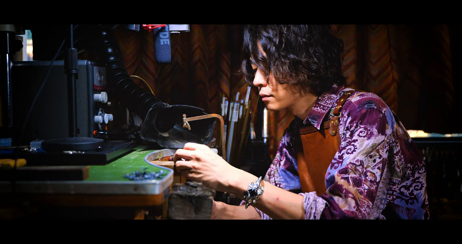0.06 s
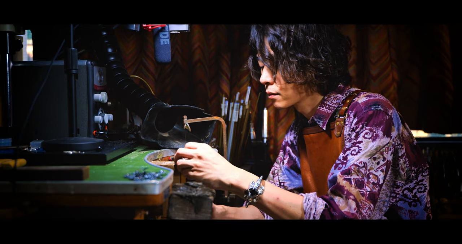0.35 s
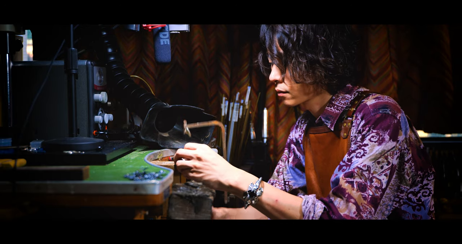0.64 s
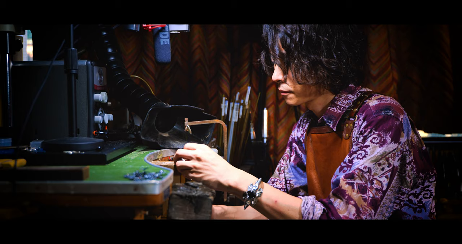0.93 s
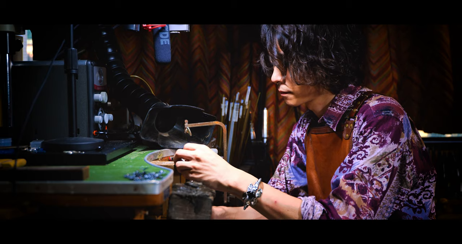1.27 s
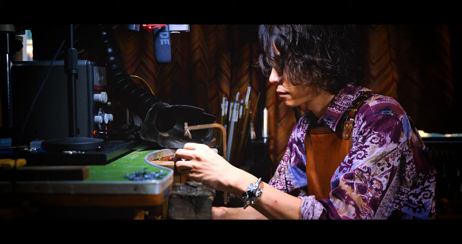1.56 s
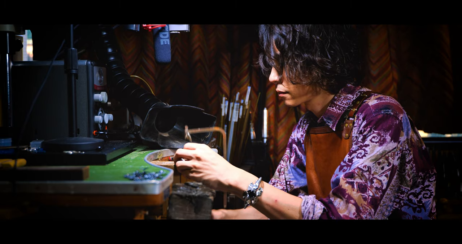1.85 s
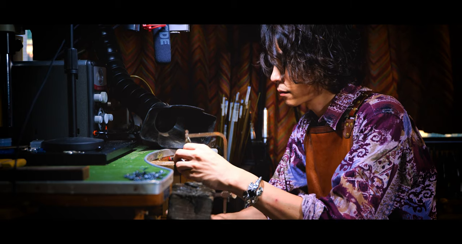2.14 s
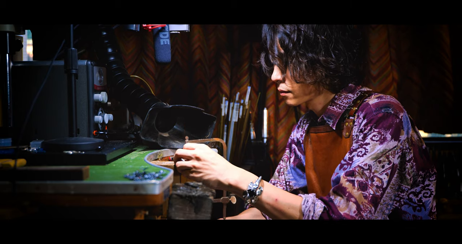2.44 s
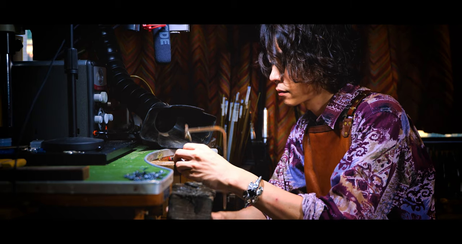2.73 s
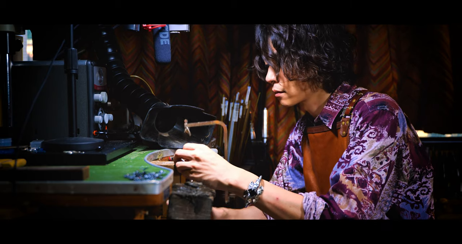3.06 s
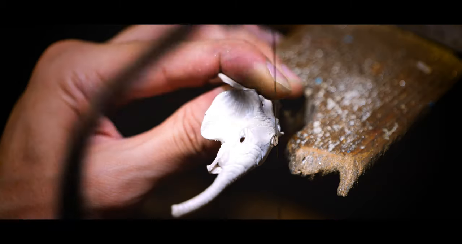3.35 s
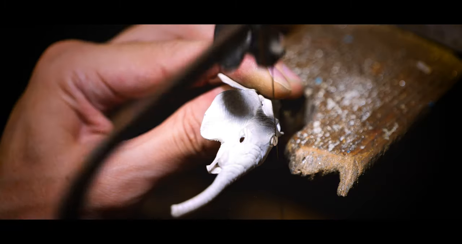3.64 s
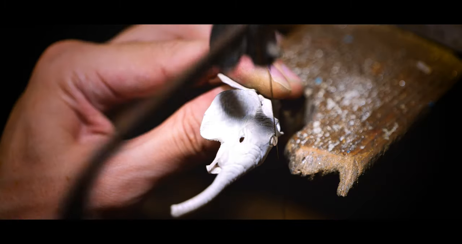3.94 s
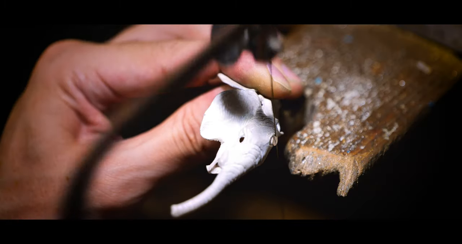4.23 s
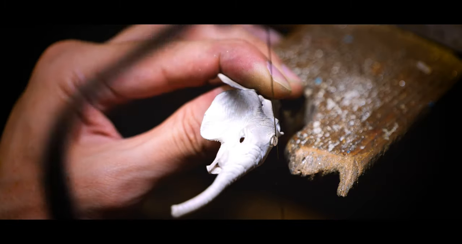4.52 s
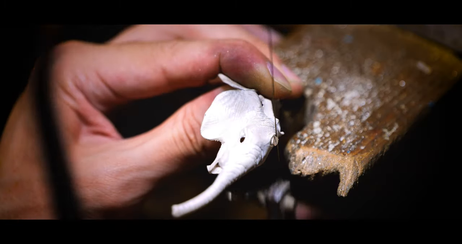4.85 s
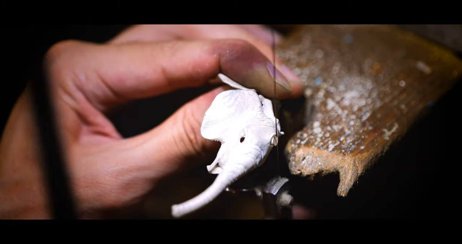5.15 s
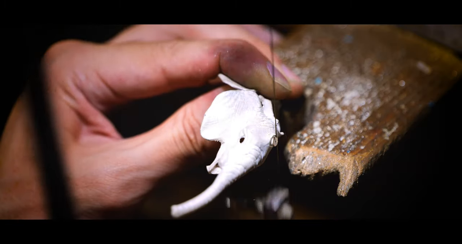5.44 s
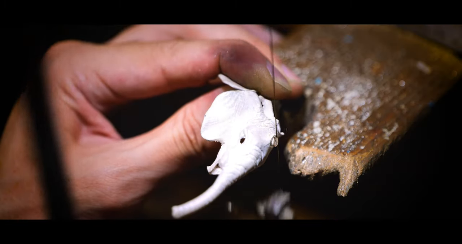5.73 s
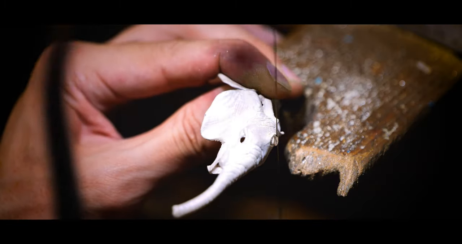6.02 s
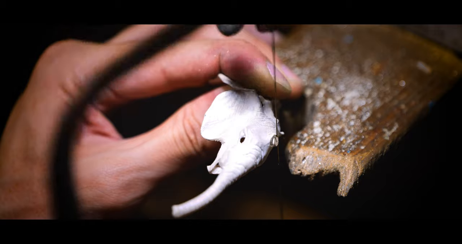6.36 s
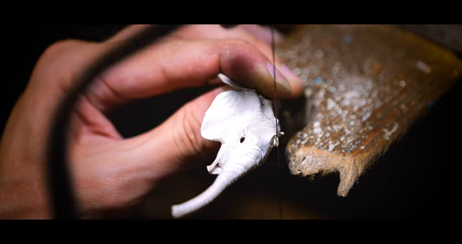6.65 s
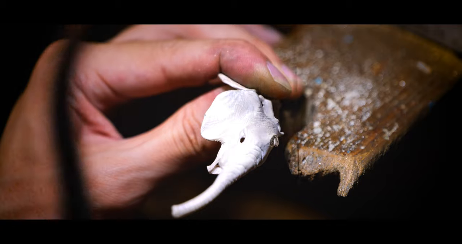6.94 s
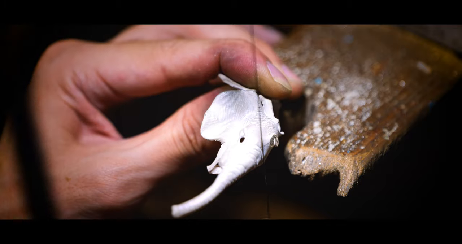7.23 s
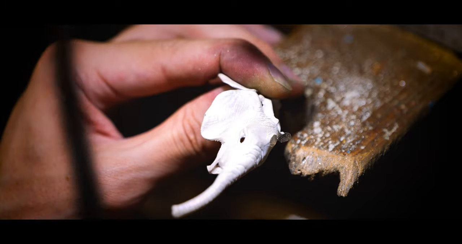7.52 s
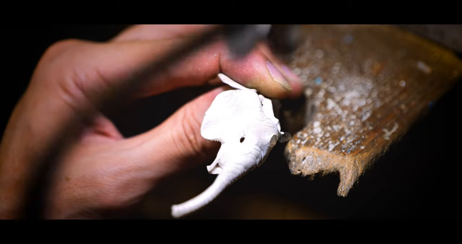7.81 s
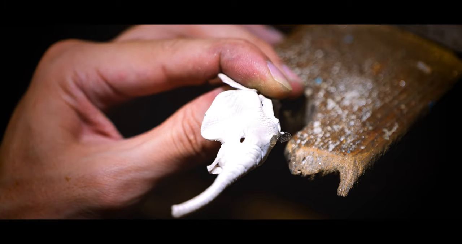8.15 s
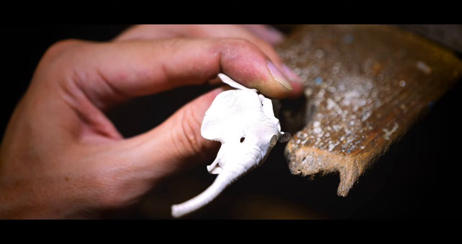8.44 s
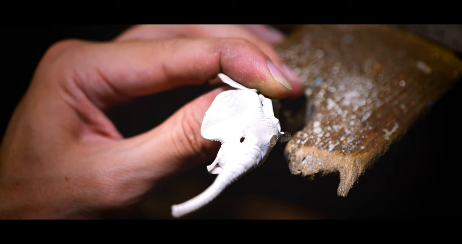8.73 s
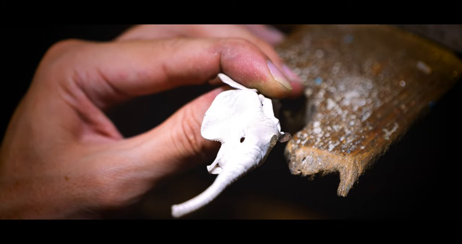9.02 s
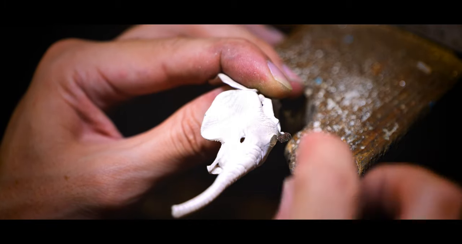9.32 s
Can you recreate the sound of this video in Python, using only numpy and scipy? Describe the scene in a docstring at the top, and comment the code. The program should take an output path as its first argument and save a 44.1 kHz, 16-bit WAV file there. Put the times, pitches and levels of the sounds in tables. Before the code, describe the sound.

A thin saw blade is set against a small metal piece with a light ping and scratch right at the start. From about 0.5 seconds a jeweller's hand saw rasps back and forth, quickening to around seven strokes a second by 3 seconds. The fine teeth make a bright, gritty sound, mixed with thin whistles and many brief squeals as the blade binds. Irregular ticks and small knocks come from the saw frame and the wooden support when the teeth catch. The sawing stops at about 6.8 seconds. Between 7.2 and 7.7 seconds the blade comes free with light pings, a scratch and a small metallic clank. From 8.6 to 9 seconds the saw is laid on the wooden bench with a few clacks, the loudest a sharp knock at 8.8. The microphone is close, in a small, quiet room with a faint fan whine.

```python
"""Jeweller's saw at the bench

One microphone, close to a wooden bench pin in a small, quiet room with a faint fan whine.
A saw cuts a small silver piece, about seven strokes a second: the teeth grab and rasp, shaking frame
and pin, and the work divides the taut blade into two lengths that whistle and squeal when it binds.
The blade pings as it is set in and drawn out; then the saw is laid down on the bench."""
import sys
import numpy as np
from scipy import signal
from scipy.fft import rfft, irfft
from scipy.io import wavfile
from scipy.ndimage import uniform_filter1d, map_coordinates

SR = 44100
rng = np.random.default_rng(int(sys.argv[2]) if len(sys.argv) > 2 else 0)


def materialize(psi):
    """Save the field psi as 16-bit PCM at rate SR to the path in sys.argv[1].

    A 1-D psi becomes a single channel; in a 2-D psi each row is a channel.
    """
    bounded = np.clip(np.atleast_2d(psi).T, -1, 1)
    quanta = np.round(bounded * 32767).astype(np.int16)
    wavfile.write(sys.argv[1], SR, quanta)


N = 422478

# Room tone at the microphone. Each row: frequency in Hz, relative level in dB.
AIR_SPECTRUM = [(15, -52), (25, -25.5), (59, 1), (136, -15), (169, 0.5), (209, -7), (305, -11.5),
                (895, -13), (1020, -7), (1240, -15), (2230, -19.5), (3170, -17.5), (3830, -21.5),
                (12200, -33), (15500, -37.5)]
# The room tone sinks near the end. Each row: time in seconds, relative level in dB.
AIR_FADE = [(7, -67.5), (8, -66.5), (8.5, -71), (9.5, -75.5)]
# The fan's whine. Each row: frequency in Hz, relative level in dB.
FAN_TONES = [(963.6, -79), (1044, -86), (1174, -87), (1378, -92.5)]

# Teeth catch or the saw bumps the work. Each row: start in seconds, frame peak in dB, length in seconds.
JOLT_EVENTS = [(0.01, -32, 0.1), (0.058, -22, 0.063), (0.221, -24.5, 0.022), (1.043, -22.5, .03),
               (1.415, -13.5, 0.066), (1.457, -8, 0.025), (1.531, -15.5, 0.1), (1.597, -25, 0.047),
               (1.862, -14.5, 0.11), (2.074, -6, 0.072), (2.104, -10, .07), (2.212, -13, 0.069),
               (2.242, -14, 0.042), (2.381, -16.5, 0.027), (2.406, -12.5, 0.043), (2.442, -12.5, 0.039),
               (2.488, -11.5, 0.055), (2.555, -9.5, 0.075), (2.776, -9.5, 0.044), (2.827, -13, 0.066),
               (2.914, -12, 0.066), (3.317, -15.5, 0.048), (3.657, -17.5, .14), (3.89, -12, 0.088),
               (4.469, -15, 0.079), (4.979, -9, 0.068), (5.079, -15.5, 0.033), (5.32, -14.5, 0.079),
               (5.623, -16, 0.063), (5.8, -8.5, 0.024), (5.843, -14, 0.17), (6.366, -12, 0.14),
               (6.509, -18, 0.082), (7.609, -25, 0.035), (7.65, -24.5, 0.018)]
# The hold on the work tightens. Each row: time in seconds, firmness from 0 to 1.
GRIP_CURVE = [(2.9, 0), (3.15, 0.38), (3.6, 0.73)]
# Resonances of the saw frame and of the wooden bench pin.
# Each row: frequency in Hz, width in Hz, level in dB held loosely, level in dB held firmly.
FRAME_MODES = [(576, 59, -19.5, 2.5), (629, 10, -9.5, -4), (779.7, 49, -4, 14), (909, 34, -3.5, -9.5),
               (952, 80, -2.5, -4), (1053.6, 51, 3.5, 2), (1235, 19, -20, -1), (1282, 59, -13.5, 7.5),
               (1366, 43, -24.5, 5), (1456, 58, -10.5, -28), (1940, 170, -18, -8)]
PIN_MODES = [(135, 45, -30, -20), (203, 27, -2, 4), (248, 36, -2, -7), (355, 55, 1, -7),
             (408, 42, -5, -7.5)]
JOLT_PIN_DB, JOLT_GRIP_DB = -18.5, 13  # the pin's share of a jolt; what a full grip adds to it
JOLT_LOOSENS = 0.58  # share of the grip that a jolt shakes loose
JOLT_RISE_S, JUDDER_S = 0.002, .06  # a shove's rise; one longer than JUDDER_S swells gradually

# The blade is plucked. Each row: start in seconds, peak in dB, 0 if threaded in the work or 1 if free,
# factor on the ring time.
PLUCK_EVENTS = [(0.0218, -36, 0, 0.64), (.065, -16.5, 0, 0.95), (6.8735, -51.5, 1, 2.2),
                (7.228, -50.5, 1, 0.71), (7.313, -35, 1, 0.8), (7.3733, -39, 1, 0.62),
                (7.385, -27.5, 1, 0.57), (7.4314, -43, 1, 0.45), (7.5555, -41.5, 1, 1.6),
                (7.5848, -37, 1, 0.59)]
# The saw's ring, threaded in the work and free of it.
# Each row: frequency in Hz, relative level in dB, base time to fall 60 dB in seconds.
THREADED_MODES = [(1060, -9, .2), (1750, 3, .17), (2672, -7, .17), (3300, 1, .1), (3930, 3, .08),
                  (4651, -11, .14), (5190, -2, .13), (10890, -3, .055)]
FREE_MODES = [(360, -14, .2), (800, -7, .12), (1066, -14, .12), (1290, -25, .38), (1572, -13, .15),
              (1850, -8, .12), (2380, -8, .15), (2466, -13, .39), (2670, -3, .16), (3080, -5, .17),
              (3645, -9, .36), (4620, -16, .15), (4885, -16, .15), (5740, -19, .1), (6270, -24, .15)]
# Resonances of blade, clamps and work. Each row: frequency in Hz, width in Hz, level in dB.
STEEL_MODES = [(1900, 45, 6), (1971, 55, 9), (2122, 55, 4), (2280, 24, 13), (2346, 70, 6), (2470, 60, 3),
               (2670, 19, 18), (2880, 130, 2.5), (3068, 20, 10), (3238, 26, 7), (3900, 90, 0),
               (4645, 50, -3.5), (5146, 60, -16), (5690, 70, -14), (6190, 120, -19), (6430, 25, -14),
               (11000, 540, -31), (14000, 200, -31.5)]
# The broad hiss of the cut. Each row: frequency in Hz, level in dB.
HISS_SPECTRUM = [(1200, -65.5), (1800, -27.5), (3000, -29.5), (4500, -46.5), (7000, -32.5), (11500, -29),
                 (12300, -48), (14300, -52), (15700, -52.5)]
# The blade is set in or drawn out. Each row: centre in seconds, half length in seconds, level in dB.
DRAG_EVENTS = [(0.053, 0.013, -39), (6.768, 0.025, -40), (7.394, 0.052, -50), (7.625, 0.019, -31)]

# Cutting pulls alternate with light returns, a pull first. Each row: start in seconds, force in dB.
HAND_STROKES = [(0.39, -13), (0.487, -10.5), (0.629, -5), (0.847, -2), (1.027, -2.5), (1.185, -3),
                (1.35, -2.5), (1.512, -0.5), (1.68, 1), (1.85, 0), (2.029, 0.5), (2.197, -1), (2.367, -2.5),
                (2.539, -0.5), (2.729, 1), (2.908, 1.5), (3.07, 2.5), (3.207, 2), (3.343, 1), (3.467, 3.5),
                (3.61, 4.5), (3.748, 5), (3.88, 2.5), (4.013, 2), (4.149, 1.5), (4.279, 0), (4.426, -2),
                (4.553, -2.5), (4.688, -0.5), (4.829, 0), (4.963, -2), (5.114, 0.5), (5.243, 0.5),
                (5.382, 0), (5.521, -1.5), (5.652, 1), (5.786, -2), (5.915, 1.5), (6.042, -1.5),
                (6.177, -2), (6.31, -1), (6.44, 0.5), (6.579, -3.5), (6.724, -23)]
STOP_S = 6.83  # the last stroke ends
# Share of the blade above the work where the hand turns.
# Each row: time in seconds, share before a pull, share before a return.
BLADE_SWING = [(.4, .43, .76), (2.6, .42, .78), (3.1, .34, .69), (3.6, .275, .67), (5, .305, .615),
               (6.7, .29, .63)]
# How a stroke's force is shared among the parts; first row held loosely, second row firmly.
# Each row: relative gain in dB on a pull, relative gain in dB on a return.
PIN_DRIVE = [(-35.5, -42), (-26.5, -32.5)]
FRAME_DRIVE = [(-22.5, -26), (-25, -30)]
RASP_DRIVE = [(-31.5, -35.5), (-24, -25.5)]
WHISTLE_DRIVE = [(-45, -40.5), (-40, -30)]
PULL_SWELL_DB, RETURN_SWELL_DB = 1.5, -4  # a pull leans in from start to end, a return eases off
WHISTLE_SWELL_DB = 3  # the blade's song builds up during a stroke
# Rasp and whistle as the cut goes on. Each row: time in seconds, gain in dB.
CUT_KEENNESS = [(.56, -46), (.64, -2.5), (2.2, -3.5), (2.5, 1.5), (3.3, -2), (4.3, 1), (4.6, 1), (5.3, 1.5),
                (5.6, -3.5), (6.68, -2.5), (6.76, -32)]
TOOTH_HZ, TOOTH_SPREAD, TOOTH_JITTER = 1080, .07, .09  # mid-stroke rate; spread by stroke; unevenness
# Harmonics of the whistle. Each row: multiple of the pitch, relative level in dB.
WHISTLE_HARMONICS = [(1, 0), (2, -1), (3, -6), (4, -10)]
# How well the blade sings. Each row: frequency in Hz, relative level in dB.
WHISTLE_SPECTRUM = [(1200, -16), (2000, -5), (2700, 1), (3900, 2), (4300, -1), (4650, 4), (5000, -3),
                    (6400, -4), (8500, -8), (11000, -10), (13000, -28)]

# The blade binds in the cut. Each row: centre in seconds, pitch in Hz, level in dB,
# half length in seconds, glide (1 rising, -1 falling, 0 steady).
SQUEAL_EVENTS = [(0.767, 2660, -32.5, 0.016, 1), (0.931, 2660, -34, 0.03, -1),
                 (1.31, 2900, -30.5, 0.0063, 1), (1.622, 2485, -29.5, 0.026, 1),
                 (1.653, 2810, -29, 0.015, 1), (1.753, 2740, -28, 0.013, 1), (1.935, 4650, -35, .02, 1),
                 (2.316, 2925, -28, 0.0066, 1), (2.454, 2704, -28, 0.03, 0), (2.638, 2686, -18, 0.029, 0),
                 (2.656, 2950, -25, 0.0088, 1), (2.815, 2640, -24, 0.014, 1),
                 (3.003, 2713, -25.5, 0.019, 1), (3.191, 2734, -25.5, 0.016, 0),
                 (3.409, 4610, -34.5, 0.011, 1), (3.531, 4530, -27.5, .01, -1),
                 (3.549, 3324, -26, 0.027, 1), (3.706, 3070, -17.5, 0.021, 1),
                 (3.827, 2184, -21.5, 0.024, -1), (3.845, 3760, -23.5, 0.011, 1),
                 (3.941, 4530, -25.5, 0.011, 1), (4.083, 4673, -28.5, 0.011, -1),
                 (4.099, 3040, -21.5, 0.029, 1), (4.232, 2682, -26.5, 0.017, 1),
                 (4.363, 3047, -30, .018, 1), (4.612, 4660, -28, 0.0094, -1), (4.898, 2830, -30, 0.022, 1),
                 (5.074, 3210, -25, 0.019, 1), (5.166, 2664, -21.5, 0.037, 0),
                 (5.17, 4640, -26, 0.0094, -1), (5.349, 2957, -19.5, 0.024, 1),
                 (5.443, 2790, -20, 0.021, 1), (5.87, 4670, -31.5, 0.0081, 1),
                 (5.884, 2685, -25.5, 0.013, 0), (5.934, 2694, -19.5, 0.0081, 0),
                 (6.12, 4603, -38, 0.018, 1), (6.249, 3080, -28, 0.026, 1), (6.524, 3250, -25, 0.021, 1),
                 (6.683, 2657, -29, 0.026, 0)]
# Harmonics of a squeal. Each row: multiple of the pitch, relative level in dB.
SQUEAL_HARMONICS = [(1, 0), (2, -27), (3, -37)]
SQUEAL_ROUGH, SQUEAL_BREAK_DB = 0.55, 3.5  # share of flutter; the note catches and drops out
SQUEAL_COLOUR = .45  # how far the steel's resonances shape the note
SQUEAL_LEAD_DB, SQUEAL_LEAD_S = -19.5, 0.035  # a gliding note sounds softly before and after its peak
SQUEAL_TOP_HZ = 4720  # a high note levels off on a resonance of the frame
SQUEAL_EASE_DB = -2  # a squealing blade slides, so frame and pin shake less

# Dull bumps through the bench while sawing. Each row: start in seconds, peak in dB.
BUMP_EVENTS = [(1.82, -46), (2.541, -47)]
BUMP_RISE_S, BUMP_T60_S, BENCH_CUTOFF_HZ = 0.038, 0.3, 58.4

# The freed saw's bow strikes the work. Each row: start in seconds, peak in dB.
CLANK_EVENTS = [(7.6104, -27), (7.6196, -25), (7.651, -23.5)]
BOW_HZ, BOW_DB = 1239, 18.5  # a blow on the bow favours the modes around this pitch, by this much
CLANK_RING = .85  # the hand on the bow shortens its ring to this share

# The saw is laid down. Each row: start in seconds, relative thud level in dB, clack peak in dB.
KNOCK_EVENTS = [(8.6395, -17, -17), (8.687, -27, -52.5), (8.7096, -26.5, -25.5), (8.8234, -5, -1.5),
                (8.877, -24, -18), (8.962, -30.5, -70), (8.9839, -34.5, -34)]
# The bench top. Each row: frequency in Hz, relative level in dB, time to fall 60 dB in seconds.
BENCH_MODES = [(78, -16, .42), (165, -14, .32), (268, -8, .25), (352, -4, .26), (385, -6, .2),
               (420, -3, .22), (535, -12, .22), (620, -10, .2), (690, -8, .15), (765, -6, .14),
               (825, -5, .14), (935, -10, .14)]
# The wood's dense, short thud and the steel's clack. Each row: frequency in Hz, relative level in dB.
THUD_SPECTRUM = [(60, -23), (200, -3), (380, 0), (800, -14), (1300, -14.5), (3000, -54)]
CLACK_SPECTRUM = [(290, -33), (500, -17.5), (815, -7), (888, -17), (1180, -21), (1290, -25.5),
                  (1750, -18.5), (2760, -7), (4130, -13.5), (7130, -30), (11600, -34), (15500, -50.5)]

# The workshop's echo. Each row: frequency in Hz, time to fall 60 dB in seconds.
ROOM_DECAY = [(100, .42), (400, .32), (1500, .28), (4000, .25), (12000, .2)]
CEILING, TOP_HZ = .67, 15750  # the recorder's full scale and band limit


def amp(db):
    """Decibels to gain."""
    return 10 ** (np.asarray(db) / 20)


def unit(x):
    """Scale to rms 1."""
    return x / np.sqrt(np.mean(x ** 2) + 1e-20)


def along(points, hz):
    """Interpolate (Hz, value) points on a log frequency axis."""
    f, v = np.transpose(points)
    return np.interp(np.log(hz + 1), np.log(f + 1), v)


def clock():
    """The time of every sample in seconds."""
    return np.arange(N) / SR


def wobble(rate):
    """A smooth random curve, rate knots a second."""
    knots = rng.standard_normal(int(N * rate / SR) + 4)
    return map_coordinates(knots, [np.arange(N) * rate / SR], order=2)


def resonances(modes, hz):
    """Gain of (Hz, width, dB) peaks with steep skirts; little radiates below a peak."""
    power = 0
    for f, width, db in modes:
        peak = 1 / (1 + ((hz - f) / width * 2) ** 2)
        skirts = np.minimum(hz / f, 1) ** 3 / (1 + ((hz - f) / f * 4) ** 2)
        power += amp(db) ** 2 * peak * skirts
    return np.sqrt(power)


def body(x, gain, size=16384):
    """Ring x through a minimum-phase filter of energy 1, shaped by gain(hz)."""
    hz = np.fft.rfftfreq(size, 1 / SR)
    cepstrum = irfft(np.log(np.maximum(gain(hz), 1e-6)))
    cepstrum[1:size // 2] *= 2
    cepstrum[size // 2 + 1:] = 0
    response = irfft(np.exp(rfft(cepstrum)))
    return signal.fftconvolve(x, response / np.linalg.norm(response))[:len(x)]


def coloured(x, spectrum):
    """Shape x with a spectrum of (Hz, dB) points."""
    return body(x, lambda hz: amp(along(spectrum, hz)))


def ring(modes, t, scatter_db):
    """Dying (Hz, dB, t60) modes at new strengths for each blow."""
    return sum(amp(db + scatter_db * rng.normal() - 60 * t / t60)
               * np.sin(2 * np.pi * (hz * t + rng.random())) for hz, db, t60 in modes)


def add(track, s, db, sound):
    """Lay a sound into the track at time s with its peak at db."""
    part = track[round(s * SR):][:len(sound)]
    part += amp(db) * sound[:len(part)] / np.abs(sound).max()


def room_tone():
    """Faint room noise with a wavering fan whine, behind everything else."""
    t = clock()
    noise = unit(coloured(rng.standard_normal(N), AIR_SPECTRUM))
    whine = sum(amp(db + 1.6 * wobble(2.6)) * np.sin(2 * np.pi * hz * t + .7 * wobble(12))
                for hz, db in FAN_TONES)
    fade_db = np.interp(t, *np.transpose(AIR_FADE))
    return amp(fade_db - 2) * noise + amp(1.5) * whine


def firmness(s):
    """How firmly the work is held at times s, 0-1."""
    return np.interp(s, *np.transpose(GRIP_CURVE))


def gripped(x, modes, firm):
    """Ring x in a held object: its ring shifts as the grip tightens."""
    loose_modes = [(f, width, db) for f, width, db, _ in modes]
    firm_modes = [(f, width, db) for f, width, _, db in modes]
    loose_ring = body(x, lambda hz: resonances(loose_modes, hz), size=8192)
    firm_ring = body(x, lambda hz: resonances(firm_modes, hz), size=8192)
    return (1 - firm) * loose_ring + firm * firm_ring


def jolts():
    """Shoves and short judders ring the frame and, more so under a firm grip, the bench pin."""
    t = np.arange(SR // 3) / SR
    track = np.zeros(N)
    for s, db, length_s in JOLT_EVENTS:
        rise = 1 - np.exp(-t / max(JOLT_RISE_S, (length_s - JUDDER_S) / 2))
        shove = rng.standard_normal(len(t)) * rise * amp(-60 * (t / length_s) ** 1.1)
        firm = firmness(s) * (1 - JOLT_LOOSENS)
        add(track, s, db, gripped(shove, FRAME_MODES, firm))
        add(track, s, db + JOLT_PIN_DB + JOLT_GRIP_DB * firmness(s), gripped(shove, PIN_MODES, firm))
    return track


def steel_gain(hz):
    """The steel's resonances on the broad hiss of the cut."""
    return resonances(STEEL_MODES, hz) + amp(along(HISS_SPECTRUM, hz))


def plucks():
    """A tooth slips off an edge with a scratch, and the taut blade pings until the work damps it."""
    t = np.arange(SR // 2) / SR
    track = np.zeros(N)
    for s, db, free, sustain in PLUCK_EVENTS:
        modes = [(hz, level, t60 * sustain) for hz, level, t60 in (FREE_MODES if free else THREADED_MODES)]
        ping = ring(modes, t, scatter_db=2) * (1 - np.exp(-t / .00024))
        scratch = amp(-60 * t / 0.039) * rng.standard_normal(len(t))
        add(track, s, db, ping)
        add(track, s, db - 8.5, body(scratch, lambda hz: steel_gain(hz) ** 0.47))
    return track


def bites(rate, scatter_db):
    """Irregular tooth impacts, rate a second, of unequal size and rms 1."""
    chance = np.clip(rate / SR, 1e-4, 1)
    size = amp(scatter_db * np.clip(rng.standard_normal(N), -2, 2)) * rng.choice([-1, 1], N)
    return unit((rng.random(N) < chance) * size / np.sqrt(chance))


def drags():
    """Slow teeth scratch along the edge of the work."""
    level = sum(amp(db) * np.exp(-((clock() - s) / half_s) ** 2) for s, half_s, db in DRAG_EVENTS)
    return body(level * bites(1500, scatter_db=3), steel_gain)


def hand_motion():
    """The hand swings in half cosines: stroke number, share of it done, blade position, speed 0-1."""
    t = clock()
    turns = np.append(np.transpose(HAND_STROKES)[0], STOP_S)
    progress = np.interp(t, turns, np.arange(len(turns)))
    stroke = np.minimum(progress.astype(int), len(HAND_STROKES) - 1)
    done = progress - stroke
    s, *ends = np.transpose(BLADE_SWING)
    short, long = (np.interp(t, s, end) for end in ends)
    position = short + (long - short) * (1 - np.cos(np.pi * progress)) / 2
    return stroke, done, position, np.abs(np.sin(np.pi * done))


def drives(stroke, done):
    """One force drives pin, frame, rasp and whistle; direction and grip decide how it is shared."""
    t = clock()
    start, force_db = np.transpose(HAND_STROKES)
    returning, firm = stroke % 2, firmness(t)
    push_db = force_db[stroke] + np.where(returning, RETURN_SWELL_DB, PULL_SWELL_DB) * (done - .5)
    keen_db = np.interp(t, *np.transpose(CUT_KEENNESS))
    moving = (t > start[0]) & (t < STOP_S)

    def level(drive, extra_db):
        """Gain of one part, smoothed across the turns."""
        loose_db, firm_db = np.array(drive)[:, returning]
        share_db = (1 - firm) * loose_db + firm * firm_db
        return uniform_filter1d(moving * amp(push_db + share_db + extra_db), size=300)

    return (level(PIN_DRIVE, 0), level(FRAME_DRIVE, 0), level(RASP_DRIVE, keen_db),
            level(WHISTLE_DRIVE, keen_db + WHISTLE_SWELL_DB * (done - .5)))


def sawing():
    """A faster blade meets more teeth: louder, denser and brighter in mid-stroke."""
    stroke, done, position, speed = hand_motion()
    pin_level, frame_level, rasp_level, whistle_level = drives(stroke, done)
    squeal, binding = squeals(position)
    firm, ease = firmness(clock()), amp(SQUEAL_EASE_DB * binding)
    pressure = amp(1.6 * wobble(60) + 1.8 * wobble(200))
    grabs = pressure * bites(300 + 550 * speed, scatter_db=-2.0)
    teeth = pressure * bites(1200 + 4500 * speed, scatter_db=3.0)
    cutting = patchy(.8 * teeth + .45 * grabs, depth_db=2.6)
    pin = gripped(pin_level * (.03 + speed ** 0.5) * grabs * ease, PIN_MODES, firm)
    shaking = .8 * grabs + .48 * tooth_train(stroke, speed)
    chatter = gripped(frame_level * (0.02 + speed ** 0.59) * shaking * ease, FRAME_MODES, firm)
    song = whistle_level * speed ** 1.4 * whistles(position, fading_db=-5.5)
    bench = amp(-41) * rumble(pin_level * grabs)
    return pin + chatter + rasp(rasp_level * cutting, speed) + song + squeal + bench


def patchy(x, depth_db):
    """Drifting random colour, in patches some hundred Hz wide and some ten ms long."""
    spectra = signal.stft(x, nperseg=256)[2]
    patches = uniform_filter1d(rng.standard_normal(spectra.shape), size=4, axis=0)
    patches = uniform_filter1d(patches, size=9, axis=1)
    return signal.istft(spectra * amp(depth_db * unit(patches)), nperseg=256)[1][:N]


def tooth_train(stroke, speed):
    """The evenly spaced teeth tick past the edge; their pitch arches with the blade's speed."""
    rate = TOOTH_HZ * speed * (1 + TOOTH_SPREAD * rng.standard_normal(len(HAND_STROKES)))[stroke]
    travel = np.cumsum(rate) / SR + TOOTH_JITTER * wobble(600)
    passed = np.maximum.accumulate(np.floor(travel))
    ticks = np.diff(passed, prepend=passed[0]) * amp(2 * rng.standard_normal(N))
    return unit(ticks / np.sqrt(rate + TOOTH_HZ / 10))


def rumble(x):
    """The heavy bench passes only the deepest part of a push."""
    return body(x, lambda hz: (hz / BENCH_CUTOFF_HZ) ** .6 / (1 + (hz / BENCH_CUTOFF_HZ) ** 4))


def rasp(cutting, speed):
    """Teeth ring the steel; near the turns and as the cut is started, slow teeth make no treble."""
    full = body((0.016 + speed ** 0.62) * cutting, steel_gain)
    dull = signal.sosfilt(signal.butter(4, 2900, fs=SR, output="sos"), full)
    bright = speed * np.interp(clock(), [.62, .72], [0, 1])
    return bright * full + (1 - bright) * dull


def whistles(position, fading_db):
    """Each free length of blade sings like a scraped string, rising and strongest while it shortens."""
    open_hz = 1315 * (1 + .04 * wobble(14) + .012 * wobble(110) + .015 * wobble(350))  # tension wavers
    tones = np.zeros(N)
    for length in (position, 1 - position):
        strength = uniform_filter1d(np.where(np.gradient(length) < 0, 1, amp(fading_db)), size=400)
        for multiple, db in WHISTLE_HARMONICS:
            scrape = 1 + .7 * (wobble(420) + 1j * wobble(420))
            breakup = amp(4.5 * np.minimum(wobble(70), 1) + 2 * wobble(9))
            note = np.exp(2j * np.pi * np.cumsum(open_hz * multiple / length) / SR)
            tones += amp(db) * strength * np.real(scrape * breakup * note)
    return unit(body(tones, lambda hz: steel_gain(hz) ** .5 * amp(along(WHISTLE_SPECTRUM, hz))))


def squeals(position):
    """A binding blade's thin note follows its free length or locks to the frame; also binding, 0-1."""
    t = clock()
    flutter = 1 + SQUEAL_ROUGH * (wobble(300) + 1j * wobble(300))
    flutter *= amp(SQUEAL_BREAK_DB * np.minimum(wobble(130), 1))
    waver = 1 + .011 * wobble(120)
    track, binding = np.zeros(N), np.zeros(N)
    for s, hz, db, half_s, glide in SQUEAL_EVENTS:
        peak = round(s * SR)
        near = slice(peak - SR // 10, peak + SR // 10)
        upper_shortens = position[peak + 1] < position[peak]
        length = position if upper_shortens == (glide > 0) else 1 - position
        bend = (length[peak] / length[near]) ** abs(glide)
        pitch = np.minimum(hz * bend, SQUEAL_TOP_HZ) * waver[near]
        note = np.exp(2j * np.pi * np.cumsum(pitch) / SR)
        swell = 1 / np.cosh(2 * (t[near] - s) / half_s)
        murmur = amp(SQUEAL_LEAD_DB) * np.exp(-((t[near] - s) / SQUEAL_LEAD_S) ** 4) * abs(glide)
        colour = (steel_gain(pitch) / np.average(steel_gain(pitch), weights=swell)) ** SQUEAL_COLOUR
        tone = colour * sum(amp(level) * note ** multiple for multiple, level in SQUEAL_HARMONICS)
        track[near] += amp(db) * np.maximum(swell, murmur) * np.real(flutter[near] * tone)
        binding[near] += swell
    return track, np.minimum(binding, 1)


def bumps():
    """Soft, deep thumps come through the bench."""
    t = np.arange(SR // 2) / SR
    envelope = (1 - np.exp(-t / BUMP_RISE_S)) * amp(-60 * t / BUMP_T60_S)
    track = np.zeros(N)
    for s, db in BUMP_EVENTS:
        add(track, s, db, rumble(rng.standard_normal(len(t)) * envelope))
    return track


def clanks():
    """The bow is struck as the saw comes free; its modes ring briefly."""
    t = np.arange(SR // 2) / SR
    modes = [(hz, db + BOW_DB * np.exp(-(2 * np.log2(hz / BOW_HZ)) ** 2), t60 * CLANK_RING)
             for hz, db, t60 in FREE_MODES]
    track = np.zeros(N)
    for s, db in CLANK_EVENTS:
        add(track, s, db, ring(modes, t, scatter_db=1.5) * (1 - np.exp(-t / .0005)))
    return track


def knocks():
    """The steel clacks on the bench top and rattles briefly; the wood answers with a thud."""
    t = np.arange(SR * 3 // 4) / SR
    rise = 1 - np.exp(-t / 0.0016)
    rattle = amp(-60 * t / 0.021) + amp(-16 - 60 * t / 0.19)
    track = np.zeros(N)
    for s, thud_db, clack_db in KNOCK_EVENTS:
        wood = ring(BENCH_MODES, t, scatter_db=2) * rise * (.5 + np.exp(-t / 0.017))
        thud = rng.standard_normal(len(t)) * rise * amp(-60 * t / .15)
        clack = np.tanh(rng.standard_normal(len(t))) * rattle
        add(track, s, thud_db - 1, wood)
        add(track, s, thud_db - 4, coloured(thud, THUD_SPECTRUM))
        add(track, s, clack_db, coloured(clack, CLACK_SPECTRUM))
    return track


def room_echo(x):
    """The workshop's short echo reaches the microphone 5 ms late; the treble dies first."""
    hz, t, spectra = signal.stft(rng.standard_normal(SR // 2), SR, nperseg=256)
    decay = amp(-60 * t / along(ROOM_DECAY, hz)[:, None])
    tail = signal.istft(spectra * decay, SR, nperseg=256)[1]
    delayed = np.pad(x, (round(.005 * SR), 0))
    return signal.fftconvolve(delayed, tail / np.linalg.norm(tail))[:N]


def scene():
    """Saw and bench close to one microphone, the room behind them."""
    saw = sawing() + jolts() + plucks() + clanks() + drags() + bumps()
    laid_down = knocks()
    echo = room_echo(amp(-10) * saw + amp(-9) * laid_down)
    return (saw + laid_down + echo + room_tone())[None]


def record(dry):
    """The recorder rounds off the loudest peak and keeps nothing above its band limit."""
    rounded = dry / (1 + (dry / CEILING) ** 6) ** (1 / 6)
    in_band = np.fft.rfftfreq(N, 1 / SR) < TOP_HZ
    return irfft(rfft(rounded) * in_band, N)


dry = scene()
out = record(dry)
materialize(out)
```